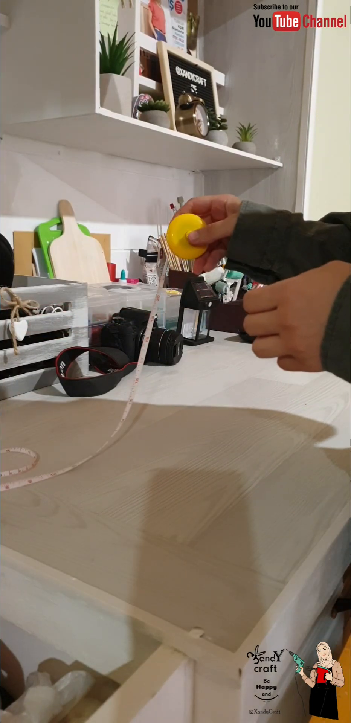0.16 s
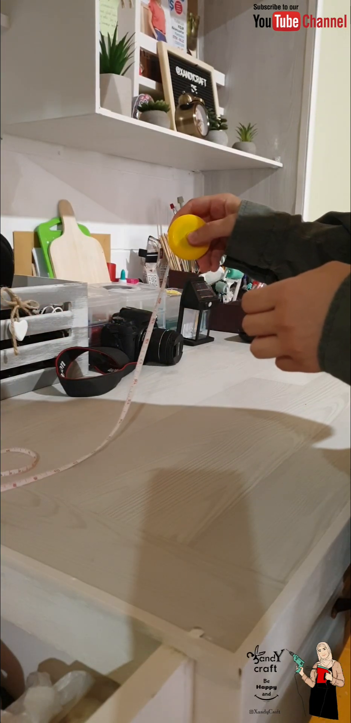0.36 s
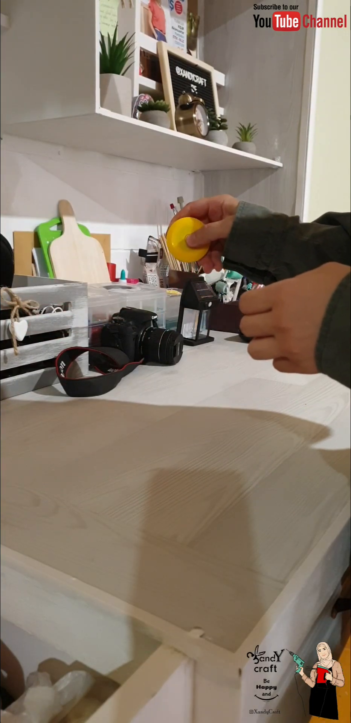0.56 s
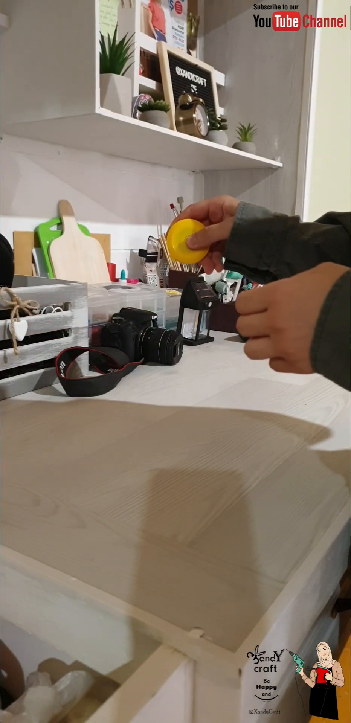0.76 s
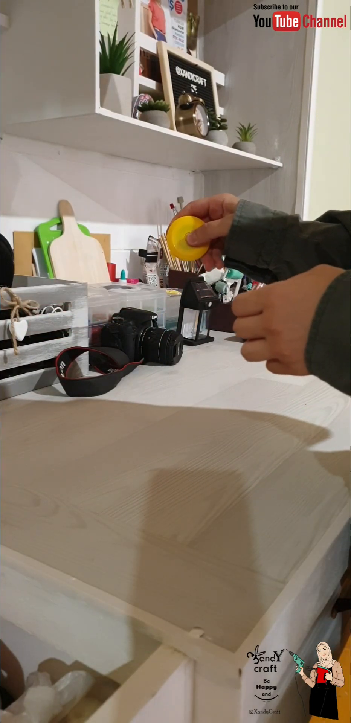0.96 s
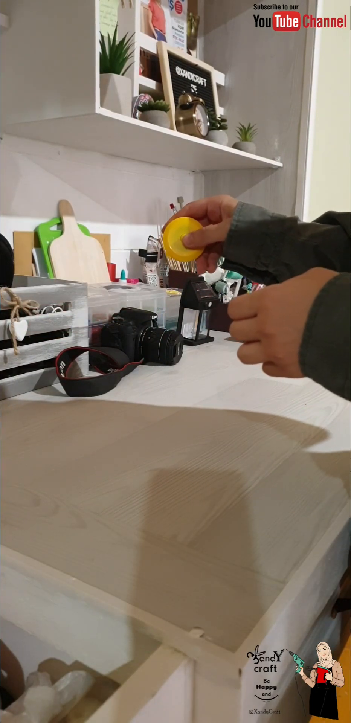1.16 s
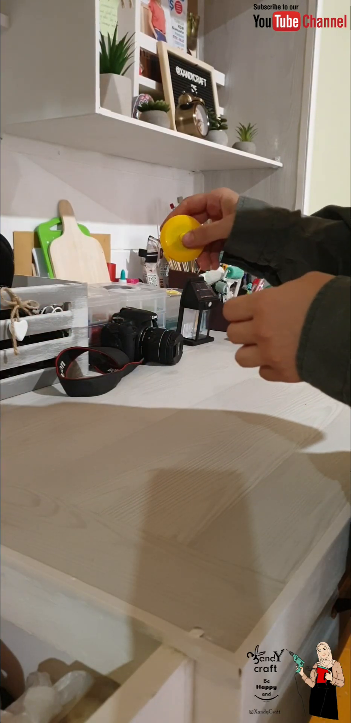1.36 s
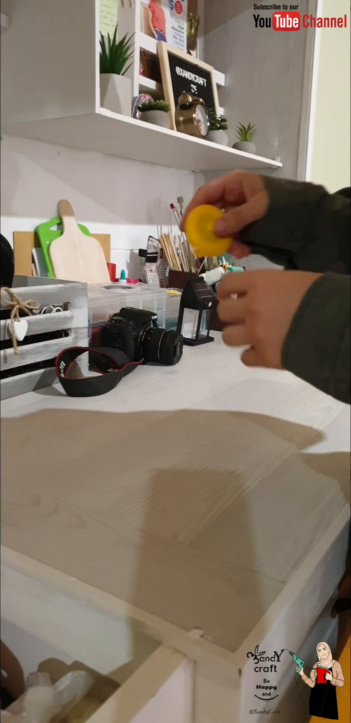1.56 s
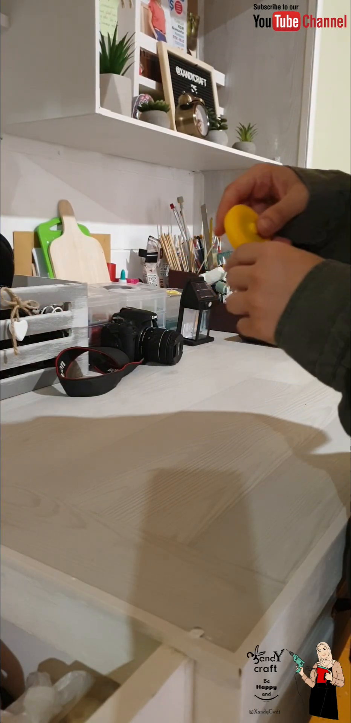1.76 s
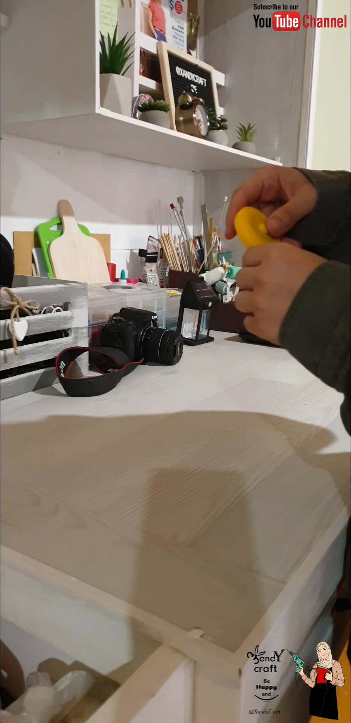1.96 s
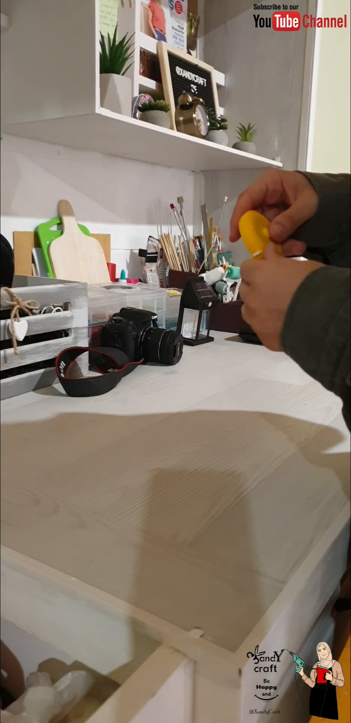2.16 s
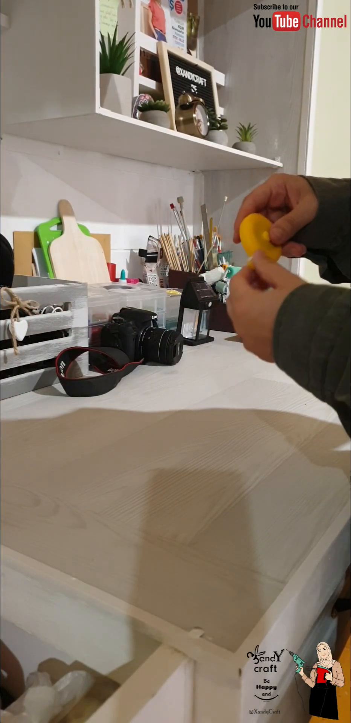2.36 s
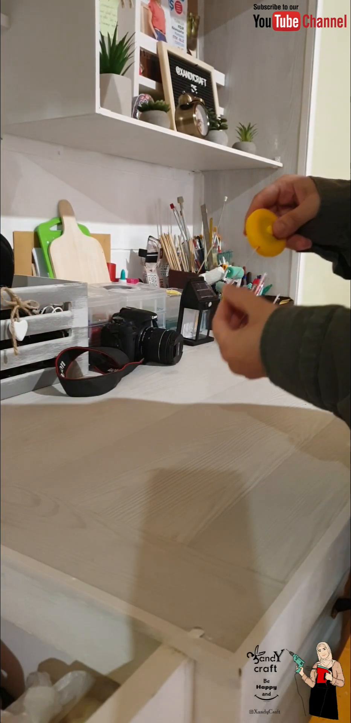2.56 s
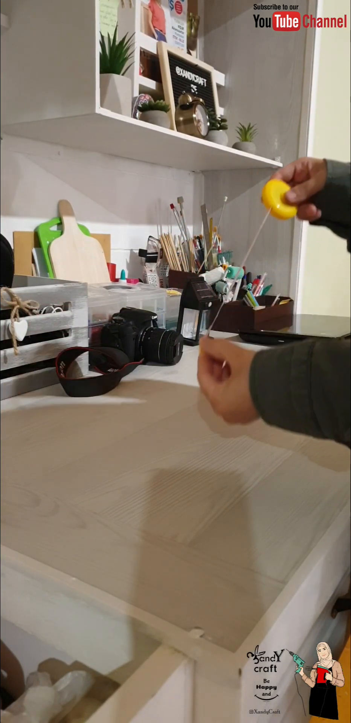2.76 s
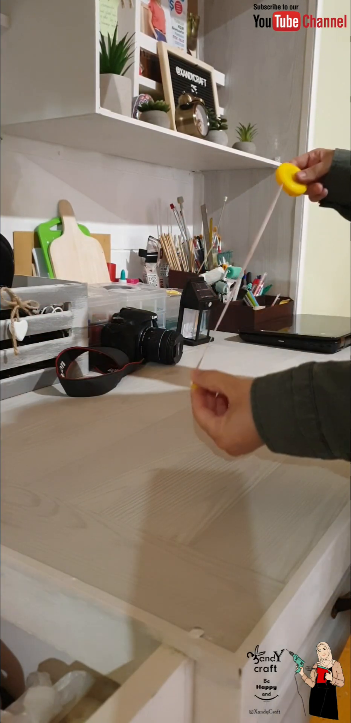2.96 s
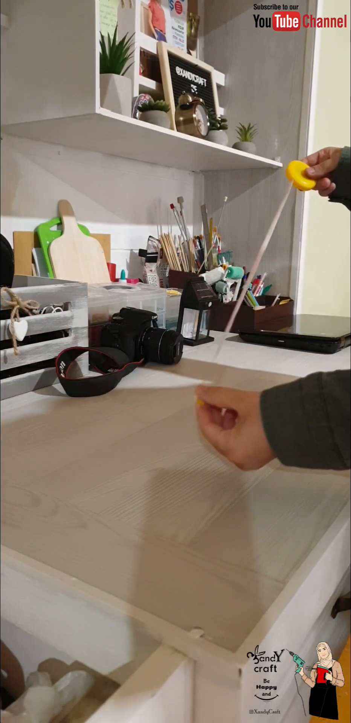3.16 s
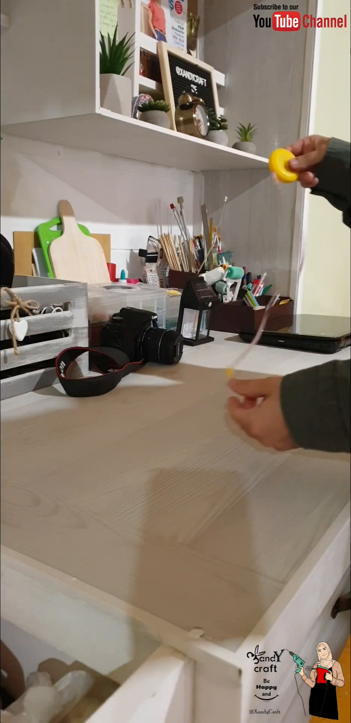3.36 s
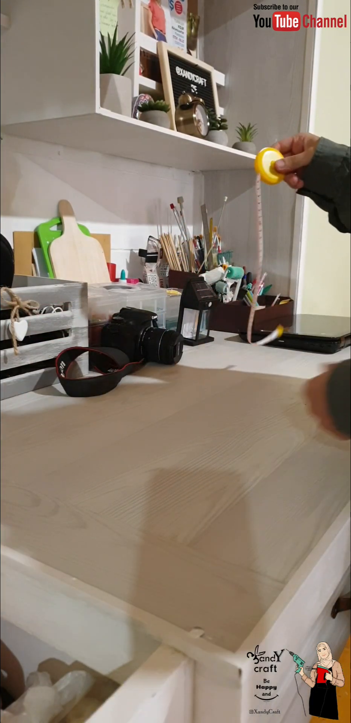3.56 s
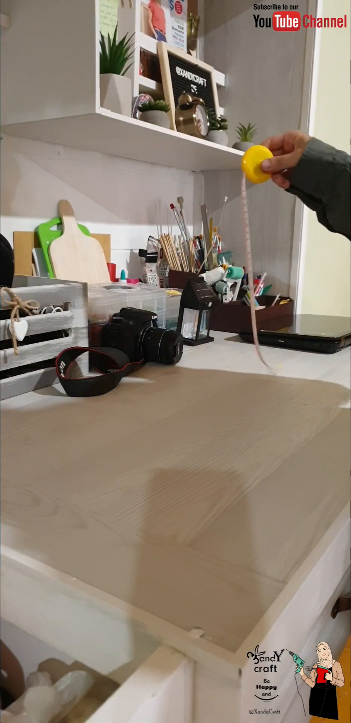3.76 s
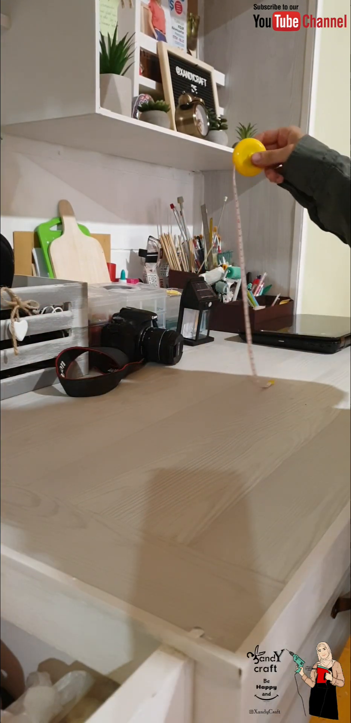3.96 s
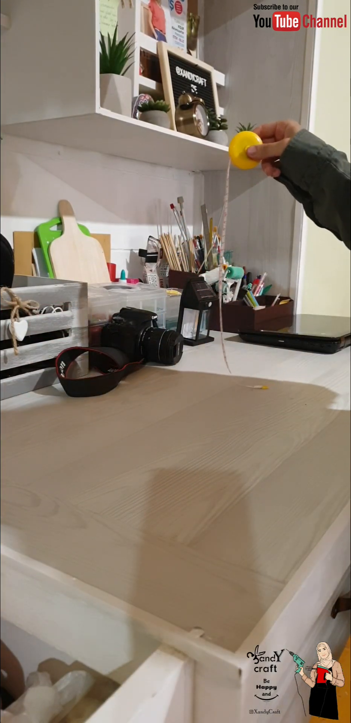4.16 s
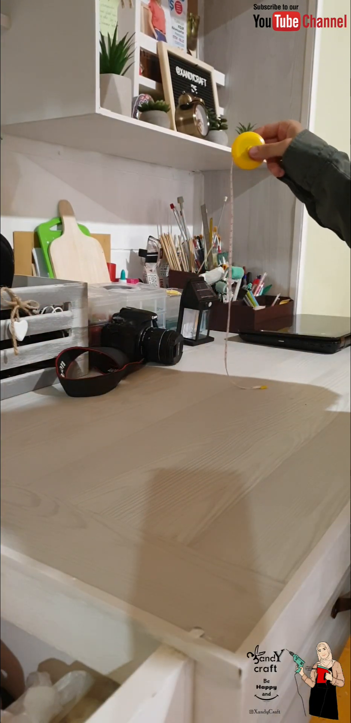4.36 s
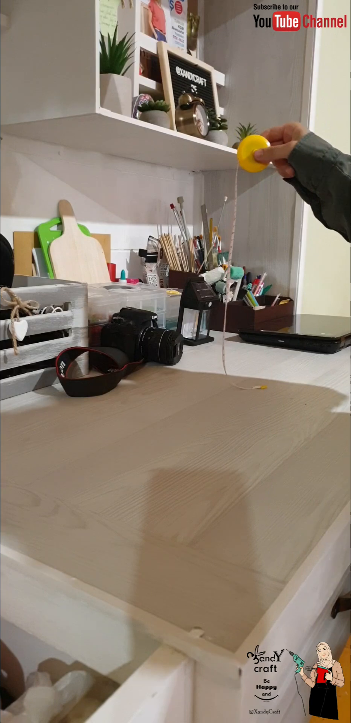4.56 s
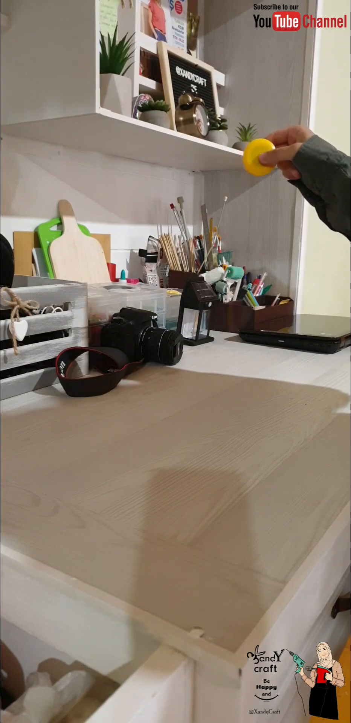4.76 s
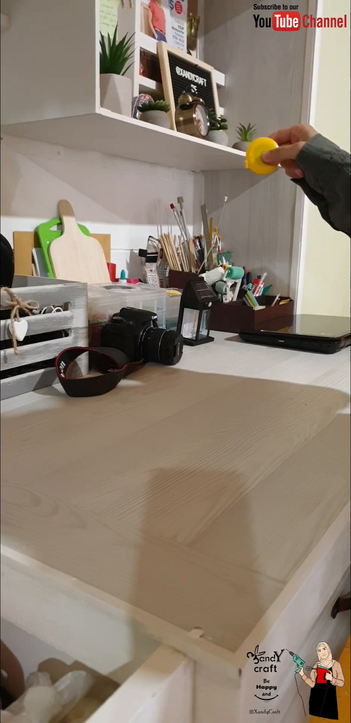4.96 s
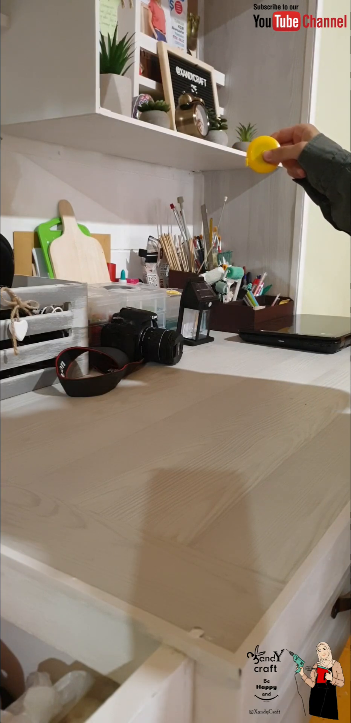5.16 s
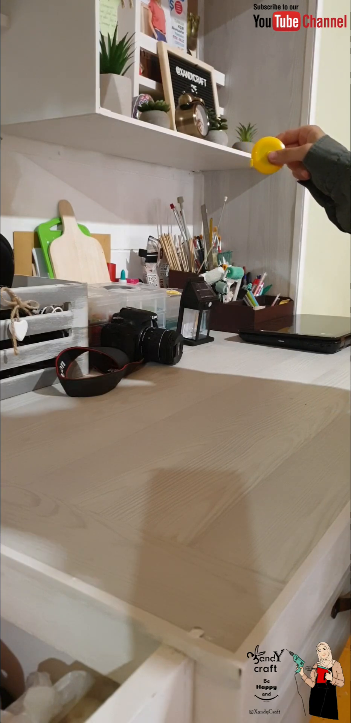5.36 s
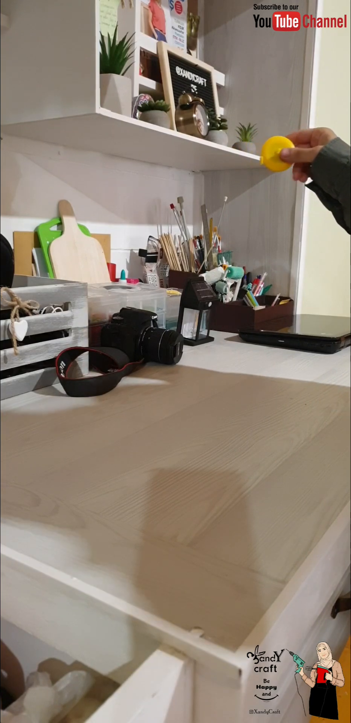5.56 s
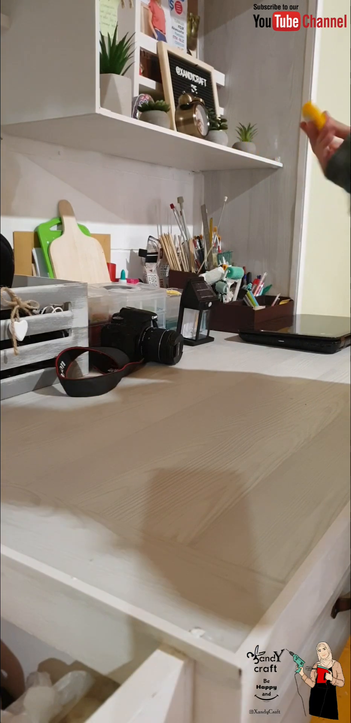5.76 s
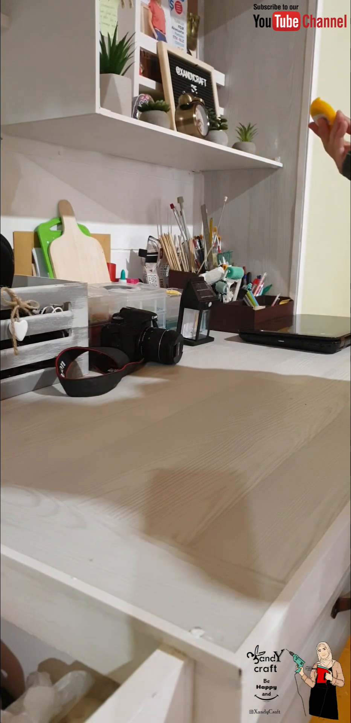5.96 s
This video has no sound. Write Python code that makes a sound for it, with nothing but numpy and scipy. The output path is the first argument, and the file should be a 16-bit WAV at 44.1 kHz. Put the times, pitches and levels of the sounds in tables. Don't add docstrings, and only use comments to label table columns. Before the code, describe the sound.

A close phone microphone in a small, hard room picks up faint hiss and low building rumble. Soft, deep footfalls thud at about 0.3 and 0.8 seconds. Around 0.46 a thin tape zips into its plastic case, ending in a bright, hard snap at 0.56, with a papery flutter and another click at 0.63. Sleeve rustle and a small tick come near 1.4 to 1.6, then a low thud at 1.95. From 2.5 to 3.25 the tape is drawn out with faint rubbing, small squeaky scrapes and clicks near 2.8 and 3.2. A clearer click with flutter lands at 3.45, lighter ticks at 3.8 and 4.2. At 4.75 the spring winds in quickly, swelling into sharp whipping slaps around 4.85 to 4.89. Short room reflections follow, then faint rubs and tiny clicks at 5.4 and 5.8, ending nearly quiet at 6.

```python
import sys
import numpy as np
from scipy import signal
from scipy.fft import rfft, irfft
from scipy.io import wavfile
from scipy.ndimage import uniform_filter1d

SR = 44100
rng = np.random.default_rng(int(sys.argv[2]) if len(sys.argv) > 2 else 0)


def int16_out(signal):
    q = np.round(np.clip(np.atleast_2d(signal).T, -1, 1) * 32767)
    wavfile.write(sys.argv[1], SR, q.astype(np.int16))


def gain_from_db(level_db):
    decades = np.asarray(level_db, float) / 20
    return 10 ** decades


N = 265041
T = np.arange(N) / SR

# start in seconds, peak in dB, floor pitch in Hz, t60 in seconds, heel in dB.
FOOTFALLS = [(0.004, -52, 48.7, 0.97, -19.5), (0.27, -31.5, 56, 0.26, -8.5),
             (0.329, -34.5, 45.6, 0.37, -24), (0.476, -48, 48.4, 0.55, -21),
             (0.773, -27.5, 51.9, 0.26, -16), (0.929, -52, 51.2, 0.74, -36), (1.29, -36, 57.9, 0.37, -4),
             (1.401, -46, 50.5, 0.27, -30), (1.95, -26, 59.87, 0.34, -17.5), (2.048, -48, 40.4, 0.45, -30),
             (2.332, -35.5, 50.9, 0.34, -22.5), (2.46, -51, 51.1, 0.26, -25.5),
             (2.689, -44, 50.6, 0.39, -6), (2.729, -44.5, 48, 0.41, -22), (3.528, -52, 49.8, 0.4, -12),
             (3.977, -55.5, 51.1, 0.24, 3), (4.068, -38.5, 49.6, 0.16, -5.5),
             (4.183, -48.5, 47.4, 0.39, -22), (4.726, -44, 47, 0.26, -13.5), (4.879, -45.5, 50, 0.29, -7),
             (5.333, -54, 48.9, 0.37, -13), (5.688, -57.5, 50.6, 0.16, -3)]


def shape(x, points):
    hz, db = np.transpose(points)
    log_hz = np.log(np.arange(x.shape[-1] // 2 + 1) * SR / x.shape[-1] + 1)
    gain = gain_from_db(np.interp(log_hz, np.log(hz + 1), db))
    return irfft(rfft(x) * gain, x.shape[-1])


def ring(x, modes):
    click = signal.unit_impulse(8192)
    out, reply = 0, 0
    for k, (hz, width, db) in enumerate(modes):
        b, a = signal.iirpeak(hz, hz / width, SR)
        twice = [np.r_[b, a]] * 2
        gain = (-1) ** k * gain_from_db(db)
        out = out + gain * signal.sosfilt(twice, x)
        reply = reply + gain * signal.sosfilt(twice, click)
    return out / np.sqrt(np.sum(reply ** 2))


def stroke(start, length, rise_s, fall_s, swell_db=0.):
    corners = start + np.cumsum([-rise_s, rise_s, length, fall_s])
    on = slice(*np.searchsorted(T, corners[[0, -1]]))
    out = np.zeros(N)
    out[on] = gain_from_db(np.interp(T[on], corners, [-60 - swell_db, -swell_db, 0, -60]))
    return out


def air():
    # frequency in Hz, level in dB per Hz.
    air_colour = [(76, -31), (130, -5), (162, -19.5), (472, -22.5), (501, -16.5), (577, -33), (863, -31),
                  (1120, -30), (1220, -21.5), (5290, -38.5), (16000, -31)]
    hiss = shape(rng.standard_normal((2, N)), air_colour)
    return hiss / hiss.std() * gain_from_db(-77.5)


def rumble():
    # start in seconds, level in dB.
    shifts = [(0.0, -44.5), (1.44, -56), (1.64, -60), (1.78, -55.5), (3.859, -74), (4.139, -49), (5.2, -82)]
    shake = np.full(N, gain_from_db(-79.5))
    for start, db, *_ in FOOTFALLS:
        shake += gain_from_db(db - 26) * stroke(start, 0, rise_s=0.081, fall_s=0.9)
    for start, db in shifts:
        shake += gain_from_db(db) * stroke(start, 0, rise_s=0.29, fall_s=0.34)
    return shake * ring(rng.standard_normal(N), [(52.1, 28, 3.5), (84, 130, -10.0)])


def sleeves():
    # start in seconds, length in seconds, level in dB.
    rustles = [(0.0, 0.0067, -60.5), (0.264, 0.11, -63), (.56, 0.071, -62.5), (0.767, 0.11, -63),
               (1.22, .07, -75.5), (1.423, 0.15, -60.5), (1.626, .1, -57), (1.775, .07, -70),
               (1.95, .03, -66), (2.25, 0.19, -69.5), (2.52, 0.42, -68), (3.466, .15, -61),
               (3.906, 0.29, -72), (4.85, 0.077, -59), (5.35, 0.057, -79), (5.97, 0.057, -72.5)]
    cloth_modes = [(285, 200, -3.0), (421, 170, 1), (553, 270, -2), (793, 380, -6)]  # Hz, width Hz, dB
    effort_now = np.full(N, gain_from_db(-81.5))
    for start, length, db in rustles:
        effort_now += gain_from_db(db) * stroke(start, length, rise_s=0.1, fall_s=0.21)
    common, left, right = rng.standard_normal((3, N))
    cloth = np.array([ring(common + 0.19 * own, cloth_modes) for own in (left, right)])
    return effort_now * gain_from_db(-4.5) * cloth


def steps():
    low, heel = np.zeros((2, N + SR))
    t = np.arange(SR) / SR
    for start, db, hz, t60, heel_db in FOOTFALLS:
        swell = (1 - np.exp(-(t / 0.027) ** 2)) * 1000. ** (-t / t60)
        turns = 0.93 * hz * (t + 0.3 * 0.045 * (1 - np.exp(-t / 0.045)))
        tone = np.sin(2 * np.pi * turns) + 0.37 * np.sin(2 * np.pi * 1.55 * turns)
        i = max(int((start - 0.012) * SR), 0)
        low[i:i + SR] += gain_from_db(db + 5) * swell * tone
        heel[i:i + SR] += gain_from_db(db + heel_db) * swell * np.exp(-t / 0.45)
    knock_modes = [(120.4, 41, 6), (194.4, 71, 1.0), (278, 335, -8.5), (448.8, 260, -13.5)]  # Hz, width Hz, dB
    knock = ring(rng.standard_normal(N), knock_modes)
    return low[:N] + heel[:N] * knock


def room(x):
    # frequency in Hz, t60 in seconds.
    decay = [(500, 0.45), (1500, 0.25), (4000, 0.3), (8000, 0.3), (14000, 0.29)]
    # delay in seconds, level in dB.
    bounces = [
        (.0033, -20),
        (.0092, -19),
        (.0112, -20),
    ]
    size = SR // 2
    t = np.arange(size) / SR
    hz, t60 = np.transpose(decay)
    noise = rng.standard_normal((2, size))
    early = np.abs(rfft(noise * np.exp(-t / 0.05))) ** 2
    unevenness = uniform_filter1d(early, size=60, axis=1) / early.mean()
    noise = irfft(rfft(noise) / np.sqrt(unevenness), size)
    tail = np.zeros((2, size))
    for k in range(len(hz)):
        tent = np.where(np.arange(len(hz)) == k, 0, -40)
        tail += shape(noise, np.c_[hz, tent]) * 1000. ** (-t / t60[k])
    tail *= gain_from_db(-16.5) * (1 - np.exp(-t / 0.002))
    for delay, db in bounces:
        tail += gain_from_db(db) * noise * (t > delay) * np.exp(-np.abs(t - delay) / 0.0012)
    return signal.fftconvolve(x[None], tail, axes=1)[:, :N]


def body(push):
    # frequency in Hz, width in Hz, level in dB.
    tab = [(5560, 3600, -8.5), (8280, 6300, -3.5)]
    case = [(1046, 390, -4), (1633, 320, -13)]
    shell = [(2200, 760, 5), (2871, 620, 6), (4453, 3000, -7.5)]
    edge = [(12100, 4000, 10), (14800, 4700, -10.5)]
    return sum(ring(p, part) for p, part in zip(push, (tab, case, shell, edge)))


def effort():
    # start in seconds, level in dB, t60 in seconds, hollow case in dB, brightness in dB.
    flutters = [(0.0, -58.5, 0.017, 2.5, -2.5), (.572, -34.5, 0.27, -18, 7), (.77, -65.5, 0.47, -4, 1),
                (1.436, -56.5, 0.41, -6.5, 3), (1.94, -71.5, 0.38, 2.5, -2), (2.081, -65.5, 0.72, -2.5, -2),
                (2.826, -62, 0.75, -2.5, -8), (3.256, -64, 0.55, -1, 2.5), (3.458, -39, 0.27, -7, -2.5),
                (3.818, -49, 0.14, -3.5, 9), (4.232, -54.5, 0.61, -10.5, 3), (4.87, -45.5, 0.26, -6.5, -2),
                (4.99, -75, 0.46, 0, 12), (5.442, -55, 0.22, -9.5, -3), (5.608, -74, 0.57, -1.5, -2),
                (5.814, -61.5, 0.47, -6, -7)]
    # start in seconds, length in seconds, level in dB, hollow case in dB, brightness in dB.
    drags = [(0.028, 0.16, -80, 0.5, 1), (0.233, 0.13, -76, -1, 2), (1.293, 0.074, -79.5, 5.5, 3),
             (1.576, 0.21, -71.5, 0, -3), (2.33, 0.17, -77, -3.5, 1), (2.506, 0.042, -72.5, 11, -8.5),
             (2.588, 0.032, -76.5, 7, 5), (2.656, 0.11, -65, 5, -0.5), (2.95, 0.087, -66.5, 10, 5.5),
             (3.078, 0.073, -73, 8, 4), (3.195, 0.075, -61.5, 0.5, -4.5), (3.615, 0.23, -73, 0, -1.5),
             (3.893, 0.28, -67, -3, -1.3), (4.4, 0.67, -81, -12, 1.5), (4.654, .05, -84.5, 5.5, -6),
             (5.38, .05, -92.5, 23, -14), (5.104, .04, -76, -6.5, -2), (5.211, .19, -76, -10.5, 6.5)]
    # start in seconds, length in seconds, final level in dB, hollow case in dB, brightness in dB.
    rewinds = [
        (0.46, 0.081, -41.5, -3, 1.4),
        (4.746, .098, -40.5, 0.4, 1),
    ]
    flutter_rise_s = 0.004
    moves = [stroke(start, 0, flutter_rise_s, t60) for start, _, t60, *_ in flutters]
    moves += [stroke(start, length, 0.13, 0.12) for start, length, *_ in drags]
    moves += [stroke(start, length, 0.03, flutter_rise_s, swell_db=12.5) for start, length, *_ in rewinds]
    db = np.array([row[1] for row in flutters] + [row[2] for row in drags + rewinds])
    hollow_db, bright_db = np.transpose([row[3:] for row in flutters + drags + rewinds])
    part_db = np.array([0 * db, hollow_db, -1.5 - bright_db, -3.5 + bright_db])
    return gain_from_db(db + part_db) @ np.array(moves)


def slide():
    # middle in seconds, length in seconds, pitch in Hz, level in dB.
    rubs = [(1.453, .045, 4130, -63), (2.097, 0.034, 2040, -63), (2.157, 0.084, 4825, -73.5),
            (2.161, .08, 2900, -61), (2.53, 0.066, 2610, -66.5), (2.669, 0.058, 1120, -60),
            (2.822, 0.043, 1115, -51), (2.882, 0.031, 1094, -54.5), (2.98, 0.036, 2600, -56.5),
            (3.2, 0.025, 2640, -59), (3.245, 0.0078, 4200, -49), (3.812, 0.013, 1670, -47.5),
            (4.251, 0.059, 1990, -54), (4.255, 0.062, 4420, -63), (4.672, 0.045, 2230, -72.5),
            (4.779, 0.029, 1143, -45), (4.854, 0.041, 1170, -44.5), (5.112, 0.04, 2130, -70),
            (5.115, 0.041, 4340, -78), (5.405, 0.17, 1900, -68.5), (5.604, .06, 1888, -76.5),
            (3.453, 0.013, 2200, -49), (2.354, 0.046, 2840, -68), (5.466, 0.063, 980, -63.5),
            (5.852, 0.11, 3040, -69)]
    size_db = np.minimum(2.5 * rng.exponential(size=N // 64 + 1), 12)
    grains = rng.standard_normal(N) * gain_from_db(size_db).repeat(64)[:N]
    grains /= grains.std()
    catch = rng.standard_normal((4, N // 1024 + 1)).repeat(1024, axis=1)[:, :N]
    catch = uniform_filter1d(catch, size=1024, axis=1)
    push = grains * gain_from_db(2.7 * catch) * effort()
    out = body(push) * gain_from_db(-9.5)
    for middle, length, hz, db in rubs:
        on = slice(*np.searchsorted(T, [middle - 2 * length, middle + 2 * length]))
        swell = np.exp(-((T[on] - middle) / (length / 2)) ** 2)
        out[on] += gain_from_db(db - 6) * swell * ring(grains[on], [(hz, 0.18 * hz, 0)])
    return out


def ticks():
    # start in seconds, tab peak in dB, hollow case in dB, shell in dB, edge in dB.
    contacts = [(0.2122, -58.5, -4.5, -2, -4), (0.454, -60, 9, 2, -11), (0.4967, -32, -5.5, 3, 2.5),
                (0.539, -36, -20, 0, 9), (0.6255, -26.5, -9.5, -7, -4), (0.5605, -16, -17.5, -17.5, 8.5),
                (0.5639, -29, -16.5, -16, 8), (1.4333, -42.5, -34.5, -4.5, -7), (1.598, -54.5, -10, 0, -6),
                (1.9385, -62.5, -12, -2.5, -19), (2.082, -59, -11, 9.5, -23.5), (2.808, -44.5, 6, 0, -4.5),
                (2.8222, -36, -9, 2, -1), (3.1799, -46.5, 1, 9, -2), (3.248, -36, -1, 0, -2),
                (3.452, -27, -14, 0, -5), (3.8123, -40, -13, 8, 0.5), (4.2265, -48, 3.5, 6.5, -4),
                (4.745, -52, 12.5, 8, -5), (4.777, -35.5, -2.5, 7, -6), (4.81, -35, -14, -4, -3),
                (4.889, -20.5, -28.5, -24, -13), (5.438, -48, 4.5, -37, -24), (5.8027, -50.5, -15, 3, -1)]
    whips = [(4.8448, -29.5, -10.5, -6, 1.5), (4.8569, -18.5, -14.5, -12, 1.5), (4.8600, -26, -6, -23, -17),
             (4.8655, -35.5, -16, -18, -2), (4.8937, -37, -16, -17.5, -11.5)]
    near, far = np.zeros((2, 4, N + 2048))
    t = np.arange(2048) / SR
    for hits, rattle_s in ((contacts, 0.0015), (whips, 0.003)):
        for start, db, hollow_db, shell_db, edge_db in hits:
            rattle = 0.4 * rng.standard_normal(2048) * np.exp(-t / rattle_s)
            rattle[0] = 1.5
            gain = gain_from_db(db + 1.0 + np.array([0, hollow_db, shell_db, edge_db]))
            i = int(start * SR)
            near[:, i:i + 2048] += gain[:, None] * rattle
            far[:, i] += gain * 0.84 * np.sqrt(np.sum(rattle ** 2))
    return body(near[:, :N]), body(far[:, :N])


def scene():
    behind = air() + rumble() + sleeves() + steps()
    near, far = ticks()
    rub = slide()
    reel = np.array([near + rub, np.roll(near + rub, 8)])
    return behind + room(far + rub) + reel


def roll_off(x):
    return signal.sosfilt(signal.butter(12, 17130, fs=SR, output="sos"), x)


def record(dry):
    # frequency in Hz, left minus right in dB.
    ports = [(60, 2.5), (200, -4.5), (400, -3.5), (800, -6), (1500, -4), (3000, -8.5), (5000, -7),
             (6500, -12.5), (7500, -13), (8600, -9), (10000, 0), (14000, -2.5)]
    # frequency in Hz, gain in dB.
    capsule = [(2900, 0), (3500, 1), (4100, 1.5), (5500, 3.5), (6800, 0.5), (8200, -7), (9500, 1)]
    hz, db = np.transpose(ports)
    left = shape(dry[0], np.c_[hz, db / 2])
    right = shape(dry[1], np.c_[hz, -db / 2])
    x = shape(np.array([left, right]), capsule)
    x = signal.sosfilt(signal.ellip(8, 0.2, 60, 16100, fs=SR, output="sos"), x)
    return roll_off(x)


dry = scene()
out = record(dry)
int16_out(out)
```